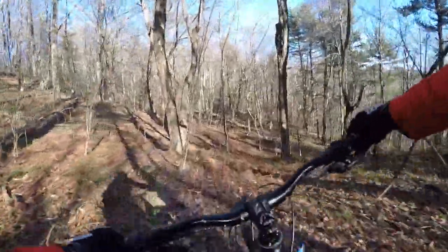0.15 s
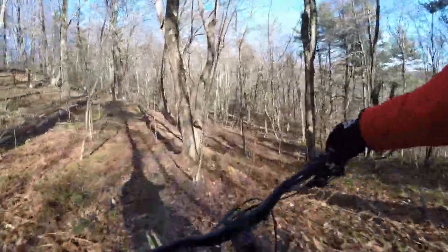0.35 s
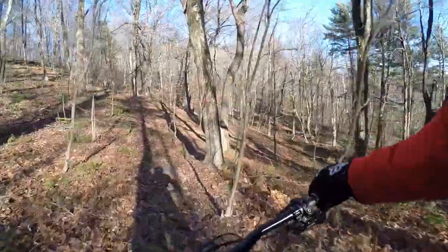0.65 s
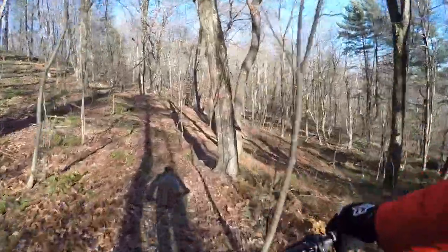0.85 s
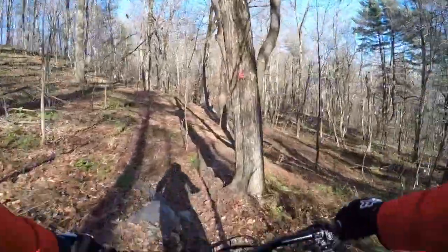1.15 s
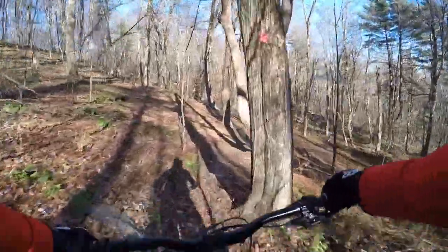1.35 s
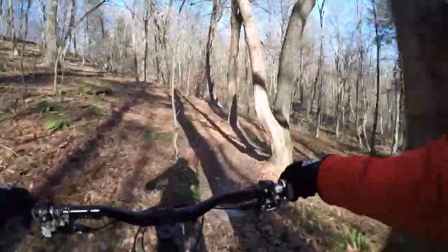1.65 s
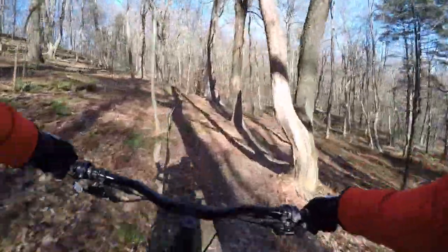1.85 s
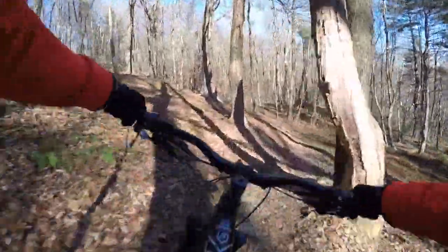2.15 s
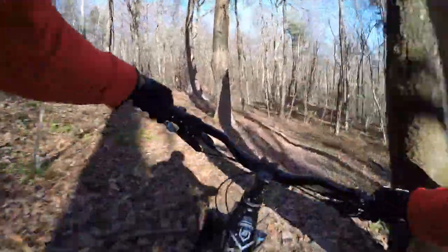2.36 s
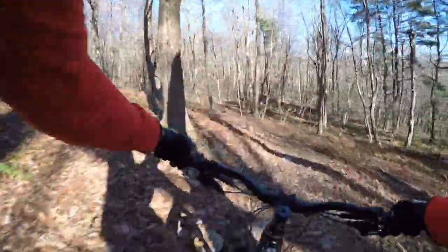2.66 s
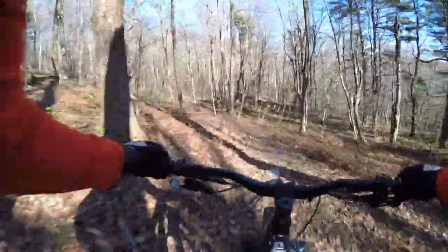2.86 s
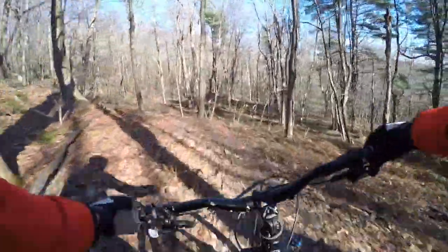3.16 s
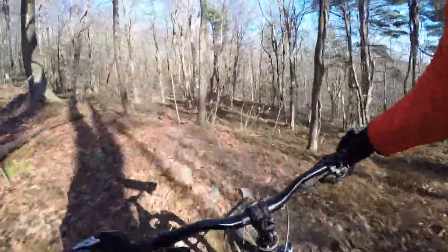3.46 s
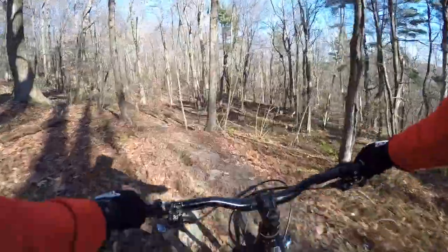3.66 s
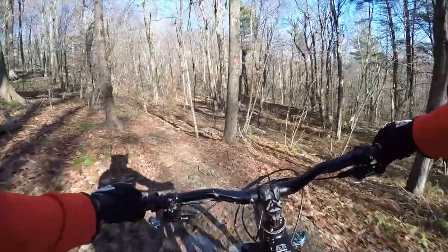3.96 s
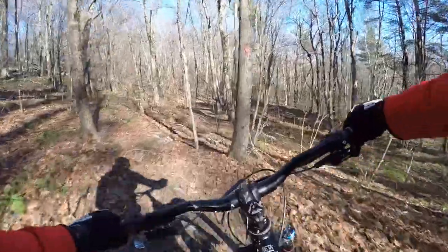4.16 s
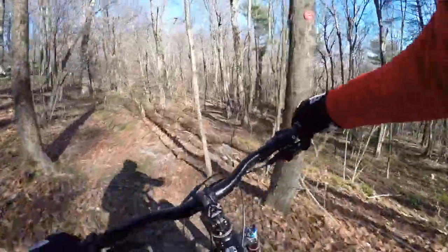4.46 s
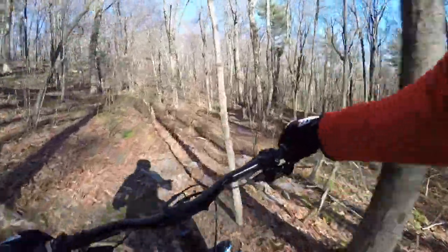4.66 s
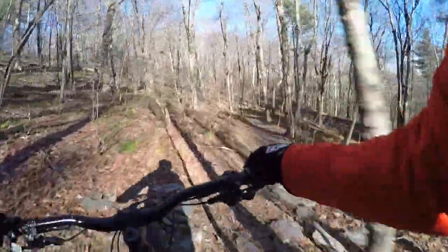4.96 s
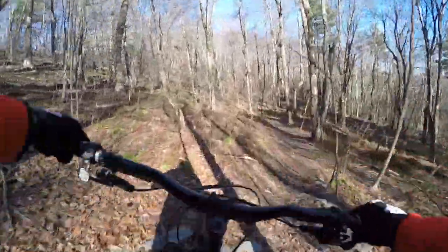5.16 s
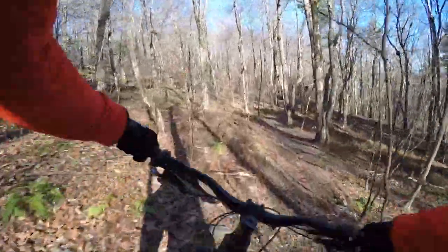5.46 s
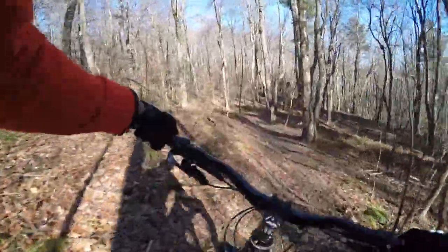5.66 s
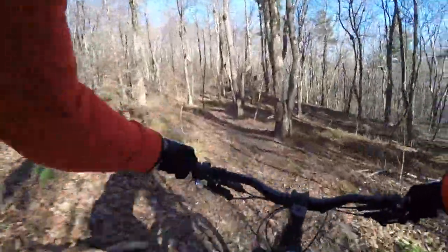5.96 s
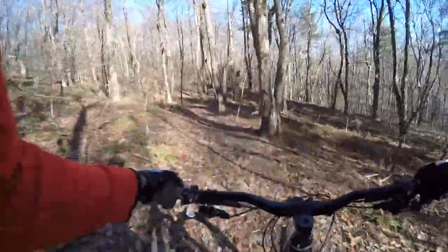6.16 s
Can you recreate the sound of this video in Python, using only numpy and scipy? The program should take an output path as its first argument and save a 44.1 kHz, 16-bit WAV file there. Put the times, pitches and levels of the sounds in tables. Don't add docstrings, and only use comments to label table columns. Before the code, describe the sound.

A mountain bike rolls fast down a leafy dirt trail, wind buffeting the microphone, tyres crunching, roots thudding, chain and cables rattling over bumps.

```python
import sys
import numpy as np
from scipy import signal
from scipy.fft import rfft, irfft, next_fast_len
from scipy.io import wavfile
from scipy.ndimage import uniform_filter1d

SR = 44100
rng = np.random.default_rng(int(sys.argv[2]) if len(sys.argv) > 2 else 0)


def makeup_ratio(level_db):
    decades = np.asarray(level_db, float) / 20
    return 10 ** decades


def to_wav(s):
    ch = np.atleast_2d(s).T
    pcm = np.round(np.clip(ch, -1, 1) * 32767)
    wavfile.write(sys.argv[1], SR, pcm.astype(np.int16))


N = 277830

# [t/s, peak level/dB, f/Hz]
ROOT_THUDS = [(0.087, -13, 137), (3.069, -15, 226), (3.087, -20, 222), (3.094, -10, 238), (3.116, -28, 300),
              (0.468, -32, 105), (0.702, -27, 159), (0.949, -22, 105), (1.279, -18, 125), (1.57, -16, 255),
              (5.939, -17.5, 150), (5.53, -13.5, 282), (0.289, -22, 304), (1.99, -17, 126),
              (2.511, -18, 290), (4.991, -25, 287), (0.424, -16, 268), (1.486, -18, 260), (2.15, -15, 280),
              (2.227, -11, 262), (2.26, -15.5, 208), (2.729, -13.5, 200), (2.893, -11, 204),
              (2.926, -14.5, 266), (3.08, -6.5, 302), (3.252, -10, 282), (3.35, -11, 292),
              (3.541, -10.5, 180), (3.665, -10.5, 182), (3.883, -9, 286), (4.183, -17.5, 264),
              (4.335, -13, 207), (4.625, -11, 188), (5.086, -9, 283), (5.158, -16, 274), (5.102, -25, 200),
              (5.265, -14, 197), (5.518, -15, 287), (5.851, -18, 235), (6.109, -10.5, 164),
              (6.216, -9, 250)]
# [t/s, peak level/dB, f/Hz]
RIM_KNOCKS = [(0.066, -14, 420), (0.199, -9.5, 404), (2.086, -16, 440), (2.545, -15, 427), (2.73, -9, 364),
              (3.422, -10.5, 397), (3.97, -16.5, 382), (5.11, -19.5, 480), (5.116, -20.5, 520),
              (5.233, -10, 464), (5.353, -18.5, 336), (5.4022, -13, 342), (5.431, -16.5, 402),
              (5.478, -18.5, 440), (5.489, -23, 437), (5.536, -37, 326), (5.095, -25, 330),
              (5.451, -17.5, 443), (4.008, -20, 456), (0.077, -35, 500), (2.927, -17, 524),
              (5.593, -8.5, 440), (5.658, -22, 370), (6.203, -16, 490), (6.2107, -9.5, 392),
              (6.12, -16.5, 420), (3.112, -19, 490), (3.122, -11, 510), (3.144, -17, 480),
              (5.222, -22, 580), (0.31, -25, 563), (3.96, -24, 610)]


def rms_one(x):
    return x / np.sqrt(np.mean(x ** 2) + 1e-20)


def peak_one(x):
    return x / np.abs(x).max()


def drift(rate_hz):
    r = np.exp(-2 * np.pi * rate_hz / SR)
    settle = 20000
    noise = rng.standard_normal(N + settle)
    return rms_one(signal.lfilter([1], [1, -2 * r, r * r], noise)[settle:])


def colour(x, spectrum):
    size = next_fast_len(N + 8192)
    hz, db = np.transpose(spectrum)
    log_hz = np.log(np.maximum(np.arange(size // 2 + 1) * SR / size, 1))
    curve_db = np.interp(log_hz, np.log(np.r_[hz[0] / 4, hz]), np.r_[db[0] - 40, db])
    cepstrum = irfft(np.log(makeup_ratio(curve_db)), size)
    cepstrum[1:size // 2] *= 2
    cepstrum[size // 2 + 1:] = 0
    return irfft(rfft(x, size) * np.exp(rfft(cepstrum)), size)[:N]


def grains(per_s, spread_db):
    sizes = makeup_ratio(spread_db * np.minimum(rng.exponential(1, N), 5)) * rng.choice([-1, 1], N)
    return sizes * (rng.random(N) < per_s / SR)


def resonance(x, hz, width_hz):
    r = np.exp(-np.pi * width_hz / SR)
    b = np.array([1, 0, -1]) * (1 - r * r) / 2
    return signal.lfilter(b, [1, -2 * r * np.cos(2 * np.pi * hz / SR), r * r], x)


def resonance_twice(x, hz, width_hz):
    return resonance(resonance(x, hz, width_hz), hz, width_hz)


def add(out, s, piece):
    i = round(s * SR)
    out[i:i + len(piece)] += piece[:N - i]


def in_time(rows):
    s, *columns = np.transpose(rows)
    return [np.interp(np.arange(N) / SR, s, c) for c in columns]


def flakes(per_s, cycles, low_hz, high_hz, patchy_db):
    clicks = grains(per_s, spread_db=2.2)
    dealt = rng.integers(0, 12, N)
    total = 0
    for k, hz in enumerate(np.geomspace(low_hz, high_hz, 12)):
        ring = resonance(clicks * (dealt == k) + 1e-18, hz, hz / cycles)
        total = total + makeup_ratio(patchy_db * drift(27.5)) * ring
    return rms_one(total)


def leaf_heaps():
    # [t/s, peak level/dB, length/s]
    leaf_drifts = [(0.19, -27, 0.023), (0.454, -32, 0.027), (0.574, -46, 0.016), (1.56, -34, 0.03),
                   (1.82, -30, 0.014), (1.883, -17.5, 0.016), (1.918, -24, 0.035), (1.97, -22, 0.069),
                   (2.09, -23, 0.036), (2.231, -17.5, 0.045), (2.389, -19, 0.03), (2.446, -20, 0.062),
                   (2.718, -19.5, 0.055), (2.851, -15.5, 0.03), (2.887, -17.5, 0.028),
                   (2.998, -19.5, 0.086), (3.124, -20, 0.061), (3.219, -15, 0.029), (3.454, -27, 0.094),
                   (3.547, -28, 0.18), (3.635, -22, 0.15), (3.75, -20, 0.02), (3.885, -15.5, 0.011),
                   (4.02, -35, 0.02), (5.065, -23, 0.048), (5.464, -36, 0.043), (5.774, -25.5, 0.033),
                   (5.997, -24.5, 0.05), (6.088, -29, 0.066), (4.56, -33.5, 0.085)]
    # [t/s, peak level/dB]
    leaf_tufts = [(2.156, -14.5), (2.317, -26), (2.601, -17), (2.921, -17), (2.951, -15.5), (3.11, -28),
                  (3.413, -18.5), (4.115, -18.5), (4.148, -21), (4.224, -25), (4.356, -26), (4.4534, -28),
                  (0.754, -29), (5.265, -27), (5.4, -13.5), (5.438, -15), (5.449, -21), (5.458, -29),
                  (5.572, -38), (5.8331, -21.5), (5.916, -23.5), (6.167, -30)]
    tuft_s = 0.017
    out, t = np.zeros(N), np.arange(SR // 5) / SR
    rise = 1 - np.exp(-(t / 0.0066) ** 2)
    for s, db, length_s in leaf_drifts + [(s, db, tuft_s) for s, db in leaf_tufts]:
        add(out, s - .004, makeup_ratio(db - 15.0) * rise * np.exp(-(t / length_s) ** 2))
    return out


def tyres(roar_db, crush_db, bright_db):
    # [f/Hz, level/dB per Hz]
    roar_spectrum = [(500, 5), (900, -4), (1300, 3), (1700, -2), (2200, -0.5), (2600, 0), (3050, -1.5),
                     (3700, -4), (5000, -12), (8000, -20), (16000, -24)]
    # [f/Hz, level/dB per Hz]
    crush_spectrum = [(700, -1.5), (1500, 3), (3000, -1.5), (5000, 1.5), (7500, -6), (10000, -17.5),
                      (16000, -24.5)]
    # [f/Hz, level/dB per Hz]
    shred_spectrum = [(5000, -32), (8500, 3), (10000, 8.5), (12000, 9), (14500, 6), (16000, -8.5)]
    patch = drift(45)
    heaps = leaf_heaps()

    roar = rng.standard_normal(N) + 0.53 * rms_one(grains(1500, spread_db=6.0))
    roar = roar + 0.47 * flakes(1500, cycles=5.4, low_hz=690, high_hz=4210, patchy_db=1.5)
    roar_gain = (makeup_ratio(roar_db) + makeup_ratio(-10.5) * heaps) * makeup_ratio(0.47 * patch + 2.23 * drift(25))
    roar = roar_gain * rms_one(colour(roar, roar_spectrum))

    crackle = rng.standard_normal(N) + 0.5 * rms_one(grains(2500 * makeup_ratio(2.5 * drift(66)), spread_db=5.0))
    crackle = crackle + 0.77 * flakes(3500, cycles=5.1, low_hz=1800, high_hz=12050, patchy_db=3.5)
    crackle = crackle * makeup_ratio(1.8 * drift(37))
    crackle = crackle + 0.5 * makeup_ratio(3.6 * drift(25.0)) * resonance(crackle, 7480, 2000)
    crackle = crackle + 0.5 * makeup_ratio(0.8 * drift(40.0)) * resonance(crackle, 10200, 3200)

    crush = makeup_ratio(crush_db - 3.5 + 0.33 * patch) + heaps
    shred = makeup_ratio(bright_db + 0.66 * drift(32)) * crush * (crush / 0.02) ** 0.079
    coarse = crush * rms_one(colour(crackle, crush_spectrum))
    return roar + coarse + shred * rms_one(colour(crackle, shred_spectrum))


def grip():
    # [t/s, drop/dB, length/s]
    lifts = [(1.37, 1, 0.021), (2.363, 4, 0.018), (2.556, 2, 0.011), (2.663, 4, 0.021), (2.822, 2.5, 0.042),
             (2.986, 11, 0.0086), (3.386, 4, 0.028), (3.812, 6.5, 0.019), (4.073, 4.5, 0.012),
             (4.274, 4.5, 0.078), (5.682, 4, 0.011), (6.047, 5.5, 0.0088), (4.693, 3, 0.035),
             (4.952, 2.5, 0.031), (5.29, 9, 0.0067), (5.408, 7, 0.036), (5.89, 4.5, 0.029)]
    t = np.arange(N) / SR
    return makeup_ratio(-sum(db * np.exp(-((t - s) / length_s) ** 2) for s, db, length_s in lifts))


def knocks(rows, t60_s):
    out, t = np.zeros(N), np.arange(SR // 8) / SR
    cracks = rms_one(resonance_twice(rng.standard_normal((len(rows), len(t))), 370, 730))
    swell = (1 - np.exp(-(t / 0.0021) ** 2)) * makeup_ratio(-60 * t / t60_s)
    for (s, db, hz), (up, phase), crack in zip(rows, rng.random((len(rows), 2)), cracks):
        upper_hz = hz * (1.213 + 0.21 * up)
        tone = np.sin(2 * np.pi * hz * t) + 0.4 * np.sin(2 * np.pi * upper_hz * t + phase)
        add(out, s, makeup_ratio(db + 4.5) * swell * (tone + 0.13 * crack))
    return out


def landing():
    # [t/s, peak level/dB, thud level/dB]
    blows = [
        (3.1, -1.5, -4),
        (3.1052, -18, -40),
        (3.1094, -7.5, -6),
        (3.117, -23, -32),
    ]
    # [f/Hz, level/dB, width/Hz]
    clang_modes = [(292, -1, 240), (500, 5, 320), (812, 5, 510), (1300, -4, 1900), (1700, 10, 2200),
                   (2350, 4, 640), (2800, -11, 780), (3500, -4.5, 370), (4180, -8, 550), (5240, -12, 840)]
    top_hz = 5560
    out, t = np.zeros(N), np.arange(SR // 20) / SR
    contact = t * np.exp(-t / 0.00084)
    for s, db, thud_db in blows:
        pushes = rng.standard_normal((len(clang_modes), len(t)))
        for (hz, mode_db, width_hz), push in zip(clang_modes, pushes):
            ring = resonance_twice(push * contact, hz, width_hz)
            late_s = 0.045 / np.sqrt(hz)
            add(out, s + late_s, makeup_ratio(db + mode_db - 9.5) * peak_one(ring))
        tail = resonance_twice(pushes[0], 2200, 4500) * (1 - np.exp(-t / .001)) * np.exp(-t / 0.03)
        add(out, s, makeup_ratio(db - 21) * tail)
        add(out, s, -makeup_ratio(thud_db) * np.exp(-((t - .0046) / .0008) ** 4))
    return signal.sosfilt(signal.butter(6, top_hz, fs=SR, output="sos"), out)


def shudder():
    out, t = np.zeros(N), np.arange(SR // 4) / SR
    for s, db, _ in ROOT_THUDS + RIM_KNOCKS:
        add(out, s, makeup_ratio(db - 22.5) * np.exp(-t / 0.019))
    return out


def frame(db):
    # [f/Hz, width/Hz, level/dB]
    hum_modes = [(113, 59, -2), (238, 83, 1.5), (420, 127, -3), (524, 221, -8)]
    shake = rng.standard_normal(N) * makeup_ratio(2.83 * drift(60.0)) + 0.45 * rms_one(grains(250, spread_db=3.5))
    hum = 0
    for k, (hz, width_hz, mode_db) in enumerate(hum_modes):
        hum = hum + (-1) ** k * makeup_ratio(mode_db) * resonance_twice(shake, hz, 1.94 * width_hz)
    return (makeup_ratio(db) + shudder()) * rms_one(hum)


def rattles(rows, t60_s, clatter_db, width_hz):
    # [f/Hz, level/dB]
    shared_modes = [(1330, 24.5), (2250, 25), (2750, 12), (3900, -6), (5500, 4)]
    out, t = np.zeros(N), np.arange(SR // 16) / SR
    swell = (1 - np.exp(-(t / 0.00037) ** 2)) * makeup_ratio(-60 * t / t60_s)
    for s, db, hz in rows:
        push = rng.standard_normal(len(t)) * swell
        shared = sum(makeup_ratio(g) * resonance_twice(push, f, 0.18 * f) for f, g in shared_modes)
        own = resonance_twice(push, hz, width_hz)
        broad = resonance_twice(push, 2500, 4000)
        burst = peak_one(own) + makeup_ratio(clatter_db) * peak_one(shared) + makeup_ratio(-8) * peak_one(broad)
        add(out, s, makeup_ratio(db - 15.0) * burst)
    return out


def chain():
    # [t/s, peak level/dB, strongest f/Hz]
    chain_slaps = [(0.1165, -5.5, 1410), (2.2288, -17, 1030), (2.3108, -12.5, 1290), (2.368, -17.5, 1340),
                   (2.494, -8.5, 1380), (2.522, -9, 1000), (2.528, -8, 1000), (2.7332, -9.5, 1190),
                   (2.8589, -12.5, 1210), (2.9208, -12, 1350), (3.0735, -6.5, 1350), (3.167, -8, 950),
                   (3.1344, -10, 1200), (3.158, -8, 1500), (3.2288, -12, 1260), (3.3446, -17, 1340),
                   (3.46, -11, 1500), (3.8033, -14.5, 1320), (3.8322, -15, 1340), (3.882, -13, 1280),
                   (3.95, -11, 1420), (4.1789, -11.5, 1520), (5.085, -11, 1370), (5.125, -14, 1400),
                   (5.1362, -3.5, 1420), (5.142, -19, 1350), (5.2062, -7.5, 1300), (5.2095, -11, 1340),
                   (5.213, -9, 1320), (5.2165, -13, 1360), (5.2267, -8, 1180), (5.2337, -16, 1300),
                   (5.5787, -13, 1250), (5.5943, -2, 1020), (5.636, -19, 1450)]
    # [t/s, peak level/dB, strongest f/Hz]
    chatter = [(0.4179, -33, 1450), (0.555, -35, 1340), (0.9104, -46, 1640), (1.0944, -28, 1880),
               (1.1258, -37, 1500), (1.1343, -22, 1690), (1.1972, -32, 1380), (1.3, -26, 1350),
               (1.3254, -26, 1530), (1.386, -28, 1590), (1.486, -21, 1080), (1.5444, -37, 1120),
               (1.572, -21, 1180), (1.6033, -22, 1590), (1.7242, -21, 1400), (1.9185, -26, 1290),
               (1.974, -24, 2140), (2.0297, -18, 1190), (2.6107, -13.5, 1150), (4.0084, -22, 1310),
               (4.0626, -23, 1400), (4.2722, -37, 1230), (4.2872, -25, 1200), (4.369, -21, 1330),
               (4.587, -26, 1470), (4.7343, -29, 1280), (4.8213, -28, 1730), (5.159, -20, 1270),
               (5.179, -28, 1320), (5.478, -20, 1880)]
    slaps = rattles(chain_slaps, t60_s=.014, clatter_db=-2, width_hz=370)
    return slaps + makeup_ratio(4) * rattles(chatter, t60_s=0.032, clatter_db=-11, width_hz=370)


def cables():
    # [t/s, peak level/dB, strongest f/Hz]
    cable_ticks = [(1.75, -14, 2600), (2.515, -30, 1500), (3.253, -26, 1800), (4.333, -37, 1700),
                   (5.328, -14, 1590), (5.583, -17, 3270), (0.196, -16, 2100), (0.277, -14.5, 2000),
                   (0.637, -17.5, 2800), (2.146, -22, 2020), (2.252, -9, 3470), (2.394, -9.5, 2400),
                   (3.0026, -15, 2170), (4.1515, -19, 2100), (4.4273, -16, 2460), (5.2717, -14, 2350),
                   (5.452, -10.5, 2080), (5.777, -18, 1980), (6.0053, -18, 3970), (6.018, -13, 2570),
                   (6.166, -15, 1990), (6.172, -12, 2200)]
    return rattles(cable_ticks, t60_s=.017, clatter_db=0, width_hz=390)


def rubs():
    # [t/s, level/dB, length/s, f/Hz]
    chain_rubs = [(0.12, -34, 0.0043, 2150), (0.198, -37, 0.0087, 2850), (0.292, -40.5, 0.03, 3020),
                  (0.36, -43, 0.027, 2800), (0.435, -46, 0.026, 1410), (0.556, -49, 0.035, 1420),
                  (0.737, -45, 0.066, 2860), (1.142, -48, 0.018, 1560), (1.208, -44, .03, 1540),
                  (1.389, -43, 0.016, 1600), (2.034, -32, 0.0092, 1300), (2.528, -32, 0.017, 795),
                  (2.535, -35, 0.02, 1510), (3.143, -37, 0.011, 3800), (3.156, -32, .01, 2280),
                  (4.033, -38.5, 0.029, 2080), (4.296, -43, 0.013, 1250), (5.096, -42, .015, 1700),
                  (5.227, -38, 0.0098, 1050), (5.215, -54, .01, 2310), (3.118, -40, 0.0069, 1350),
                  (3.666, -35, 0.0088, 1390), (3.54, -44, .01, 1400), (0.3, -43, .02, 1120),
                  (5.467, -34, .005, 2300), (5.471, -33, .004, 2900), (5.591, -38, 0.0056, 2510),
                  (5.594, -35, 0.008, 3800)]
    half_s = .125
    out, t = np.zeros(N), np.arange(SR // 4) / SR - half_s
    for s, db, length_s, hz in chain_rubs:
        friction = rng.standard_normal(len(t))
        sing = rms_one(resonance_twice(friction, hz, 0.3 * hz)) * np.exp(-(t / length_s) ** 2)
        skip = max(0, round((half_s - s) * SR))
        add(out, max(s - half_s, 0), makeup_ratio(db) * sing[skip:])
    return out


def twigs():
    # [t/s, peak level/dB, f/Hz]
    twig_snaps = [(2.017, -16, 5040), (2.3131, -24, 7530), (2.492, -12.5, 6110), (2.8953, -31, 5640),
                  (2.9437, -12, 4750), (2.967, -12.5, 9650), (3.376, -15, 4830), (4.115, -14, 6200),
                  (5.2145, -14.5, 5770), (5.2733, -12, 3930), (6.175, -19, 4000), (5.4685, -15, 4820)]
    out, t = np.zeros(N), np.arange(SR // 100) / SR
    for s, db, hz in twig_snaps:
        crack = rng.standard_normal(len(t))
        bright = resonance(crack, hz, 700) + .04 * np.diff(crack, prepend=0)
        add(out, s, makeup_ratio(db - 8.5) * peak_one(t * np.exp(-t / .0007) * bright))
    return out


def grit():
    # [t/s, peak level/dB, centre f/Hz]
    grit_hits = [(0.64, -26.5, 2800), (2.147, -24, 1100), (3.008, -19, 2500), (3.459, -21, 2020),
                 (2.393, -20, 2600), (3.507, -26, 1800), (3.893, -22, 3540), (5.228, -36, 1980),
                 (5.236, -25, 1020), (2.228, -26, 900), (2.515, -30, 1200), (2.539, -23, 2950),
                 (2.789, -28, 2300), (3.186, -22, 2300), (3.255, -30, 805), (4.2, -30, 2800),
                 (4.335, -32, 800), (4.428, -35, 2300), (5.272, -18, 2590), (5.406, -36, 2000),
                 (5.43, -29, 696), (5.522, -29, 2000), (5.594, -22, 1300), (5.58, -21.5, 2500),
                 (6.207, -26, 2200), (6.213, -23, 700), (5.097, -33, 1800), (5.633, -21.5, 1170)]
    out, t = np.zeros(N), np.arange(SR // 100) / SR
    for s, db, hz in grit_hits:
        push = rng.standard_normal(len(t)) * t * np.exp(-t / .0009)
        add(out, s, makeup_ratio(db) * peak_one(resonance_twice(push, hz, 0.8 * hz)))
    return out


def wind(db):
    # [f/Hz, level/dB per Hz]
    wind_spectrum = [(12, 0.5), (27, 3), (41, 0.5), (58, 0), (114, -18), (170, -22), (300, -53.5)]
    # [t/s, peak level/dB, f/Hz]
    buffets = [(0.074, -10.5, 52), (0.32, -10.5, 37), (0.48, -10.5, 36.0), (0.6, -6, 37.2),
               (0.71, -14, 42.5), (1.312, -9.5, 39), (1.397, -14, 36), (1.728, -12, 40), (1.9, -7, 45.5),
               (2.089, -7.5, 39.7), (2.16, -6.5, 37.6), (2.241, -15, 44.3), (2.374, -8.5, 39.5),
               (2.512, -1.5, 38.7), (2.608, -5, 30.3), (2.71, -10, 43.5), (2.826, -6, 35.6),
               (3.016, -12, 38.2), (3.139, -6, 46.6), (3.249, -13, 34.7), (3.676, -12, 43),
               (4.028, -12, 37.5), (4.64, -4.5, 36), (4.719, -6.5, 30.3), (5.005, -12, 38),
               (5.316, -9.5, 42.3), (5.415, -18, 46.7), (5.605, -13, 43), (5.724, -7, 31),
               (6.168, -13, 40.3), (0.54, -14, 40), (0.66, -12, 39), (2.76, -8.5, 32.4), (2.885, -9, 37.8),
               (2.44, -9.5, 40.3), (3.5, -19, 45.2), (3.78, -13, 37.8), (5.95, -28, 40.3), (1.52, -29, 36)]
    # [t/s, peak level/dB, f/Hz]
    puffs = [(0.052, -35, 56.5), (0.189, -15.5, 70.4), (0.827, -26, 88.8), (1.02, -16.5, 62.6),
             (1.169, -23, 64.6), (1.713, -25, 56.5), (1.886, -20, 56.5), (2.015, -19, 94.2),
             (2.145, -19, 56.5), (2.233, -15, 56.5), (2.322, -10, 56.5), (2.697, -13.5, 57.6),
             (2.792, -15, 56.5), (2.994, -20, 56.5), (3.516, -23, 56.5), (4.329, -23, 56.5),
             (4.617, -14, 84), (4.693, -23, 56.5), (5.094, -15, 54.7), (5.289, -15, 72), (5.392, -29, 59.2),
             (6.109, -15, 72)]
    puff_late_s = 0.00807
    air = rms_one(colour(rng.standard_normal(N), wind_spectrum))
    swell = np.sqrt(uniform_filter1d(uniform_filter1d(air ** 2, 2600), 2600) + .02)
    t, eddies, calm = np.arange(N) / SR, 0, 1
    gusts = buffets + [(s + puff_late_s, peak_db, hz) for s, peak_db, hz in puffs]
    for (s, peak_db, hz), phase in zip(gusts, rng.random(len(gusts))):
        bump = np.exp(-((t - s) * hz / 0.5) ** 2)
        body = np.sin(2 * np.pi * (hz * (t - s) + phase))
        front = np.sin(2 * np.pi * (2.55 * hz * (t - s) + 3 * phase))
        eddies = eddies + makeup_ratio(peak_db - 1.55) * bump * body + makeup_ratio(peak_db - 16.5) * bump ** 2 * front
        calm = calm * (1 - 0.46 * bump)
    return makeup_ratio(db + 4.5) * calm * rms_one(air / swell ** 0.7) + eddies


def scene():
    # [t/s, level/dB]
    air_speed = [(0.0, -28), (0.59, -32), (0.95, -29.5), (1.3, -29), (1.95, -27.5), (2.25, -24.5),
                 (2.61, -28.5), (2.93, -22.5), (3.3, -32), (3.83, -27.5), (4.0, -29), (4.14, -33.5),
                 (4.33, -34.5), (4.67, -29.5), (5.02, -32.5), (5.35, -27), (6.09, -29), (6.3, -26.5)]
    # [t/s, level/dB]
    roughness = [(0.0, -31.5), (0.19, -34.5), (0.47, -40), (0.79, -41), (1.68, -34), (2.33, -34),
                 (2.44, -32), (3.12, -29), (3.47, -35), (3.88, -32), (4.07, -36), (4.51, -36),
                 (4.77, -41.5), (5.03, -42.5), (5.23, -37), (5.56, -37), (5.88, -35), (6.3, -33.5)]
    # [t/s, depth as crush level/dB, dryness/dB]
    litter = [(0.0, -40.5, -2), (0.24, -39.5, -6.5), (0.79, -43.5, -6), (1.32, -42.5, -5),
              (2.07, -33.5, -7.5), (2.26, -41, -7.5), (2.54, -42, -10), (2.82, -37.5, -8.5),
              (3.02, -40.5, -6.5), (3.37, -35.5, -10.5), (3.58, -45.5, -3.5), (4.03, -36, -9),
              (4.14, -39, -8), (4.79, -44.5, -6.5), (5.4, -38.5, -8.5), (5.61, -34, -8), (5.91, -41, -8.5),
              (6.3, -37, -7)]
    (air_db,), (ground_db,), (depth_db, dry_db) = in_time(air_speed), in_time(roughness), in_time(litter)
    roar_db = -42.5 + 0.61 * (ground_db + 37.5) + 0.18 * (depth_db + 43.0)
    rolling = grip() * tyres(roar_db, depth_db, dry_db)
    blows = knocks(ROOT_THUDS, t60_s=0.02) + knocks(RIM_KNOCKS, t60_s=0.024) + landing()
    loose_parts = chain() + cables() + rubs()
    debris = twigs() + grit()
    return (rolling + blows + frame(ground_db) + loose_parts + debris + wind(air_db))[None]


def low_pass(x):
    return signal.sosfilt(signal.butter(12, 15750, fs=SR, output="sos"), x)


def record(dry):
    ceiling, cutoff_hz = .92, 15520
    held = ceiling * np.tanh((np.abs(dry) / ceiling) ** 2) ** .5 * np.sign(dry)
    mix = signal.sosfilt(signal.cheby2(16, 45, cutoff_hz, fs=SR, output="sos"), held)
    return low_pass(mix)


dry = scene()
out = record(dry)
to_wav(out)
```